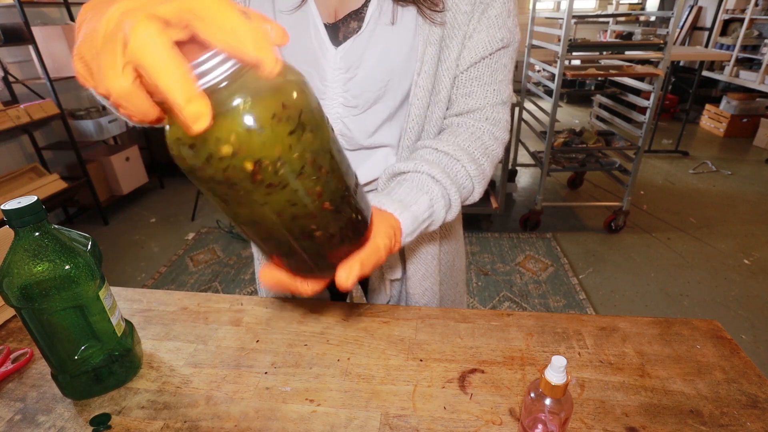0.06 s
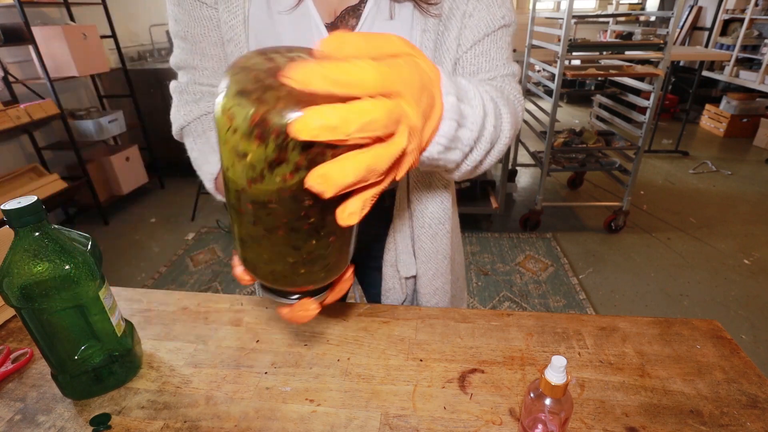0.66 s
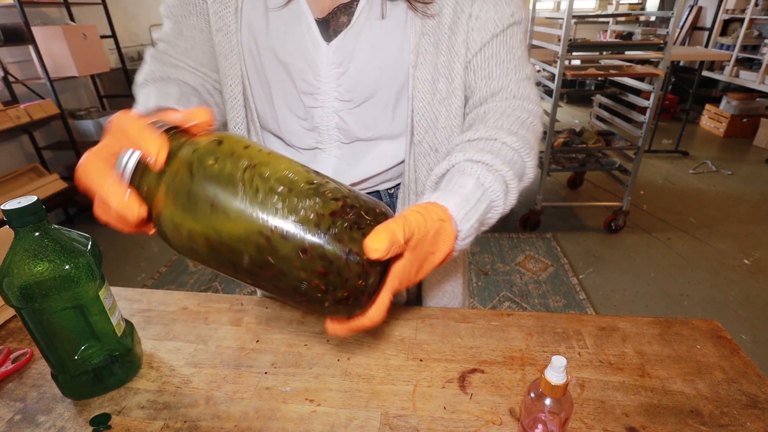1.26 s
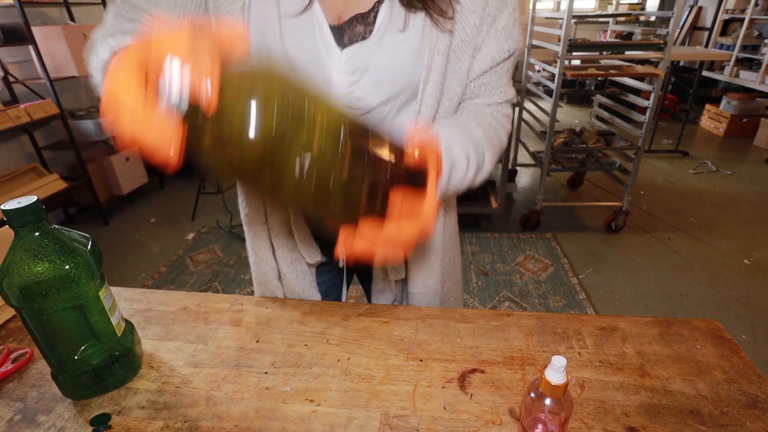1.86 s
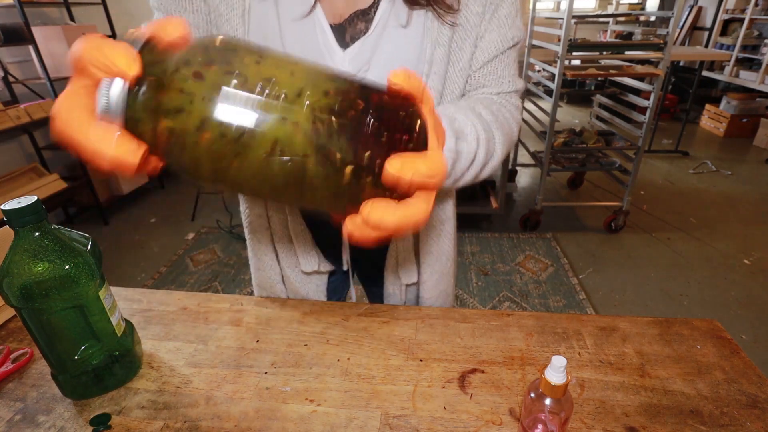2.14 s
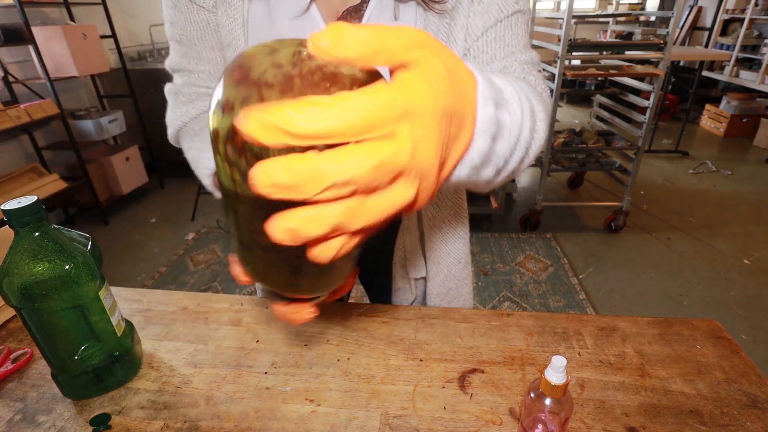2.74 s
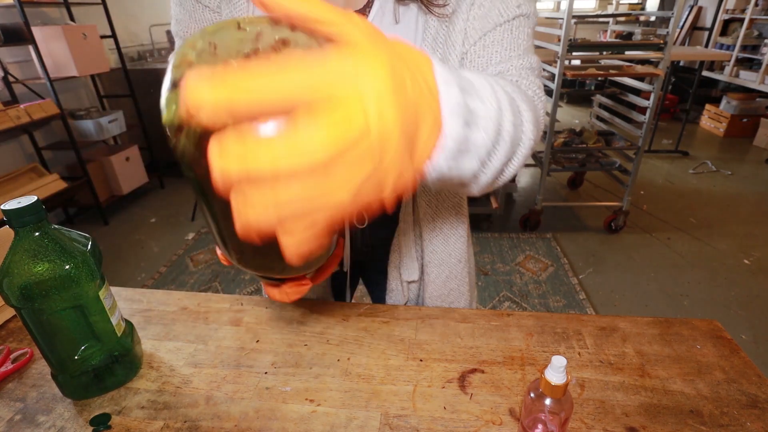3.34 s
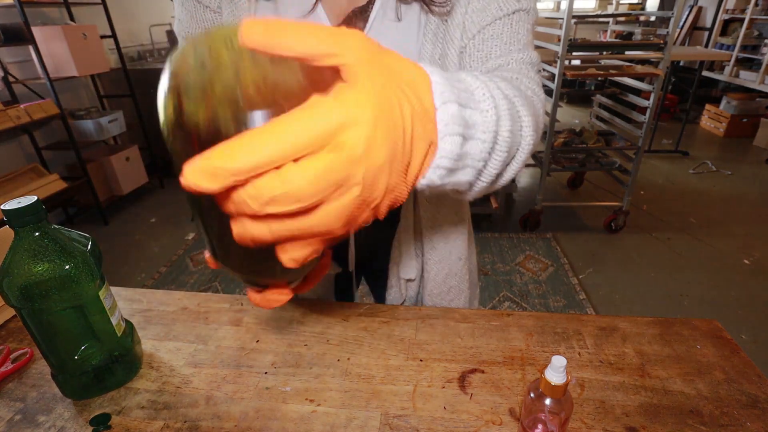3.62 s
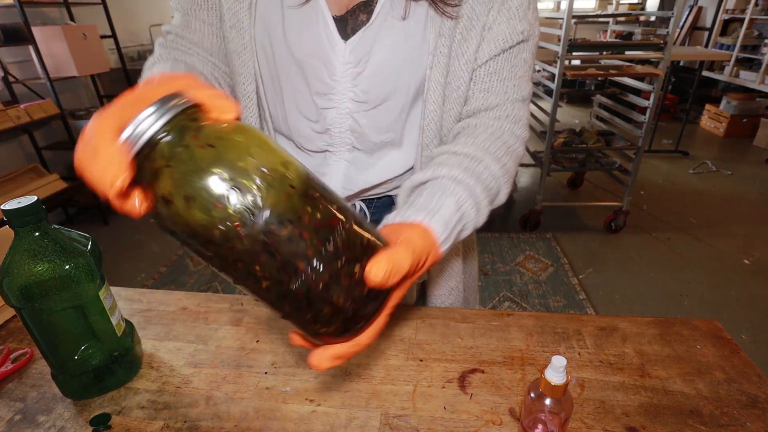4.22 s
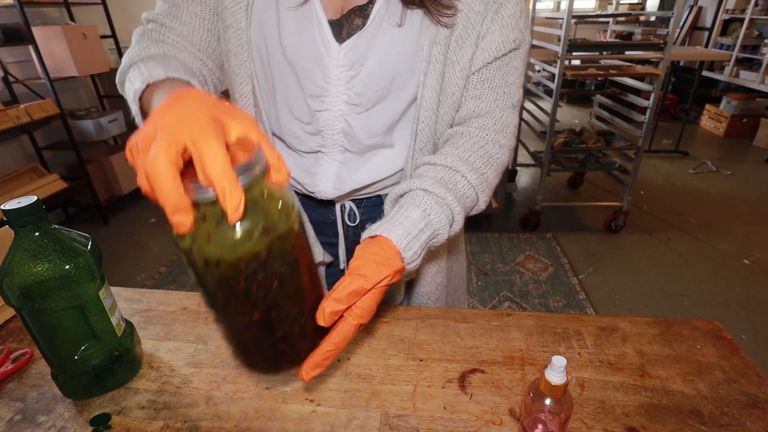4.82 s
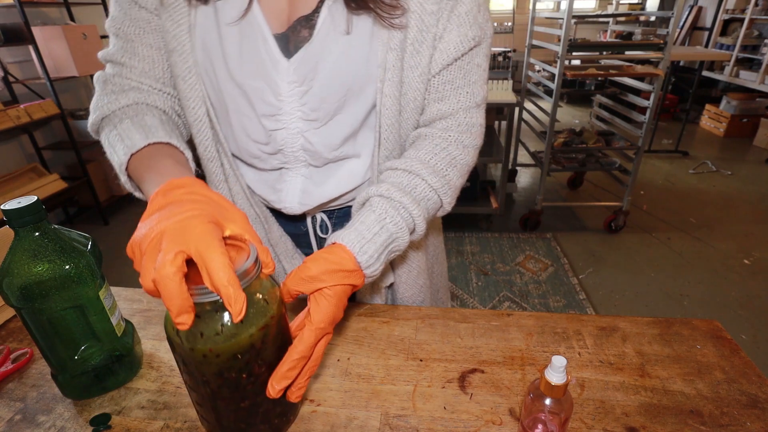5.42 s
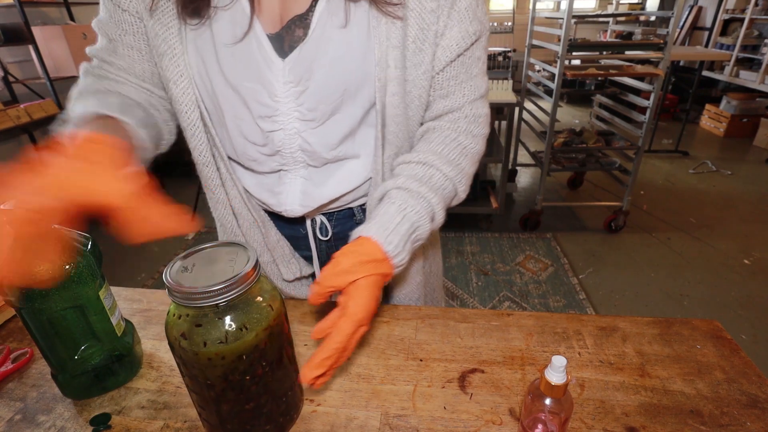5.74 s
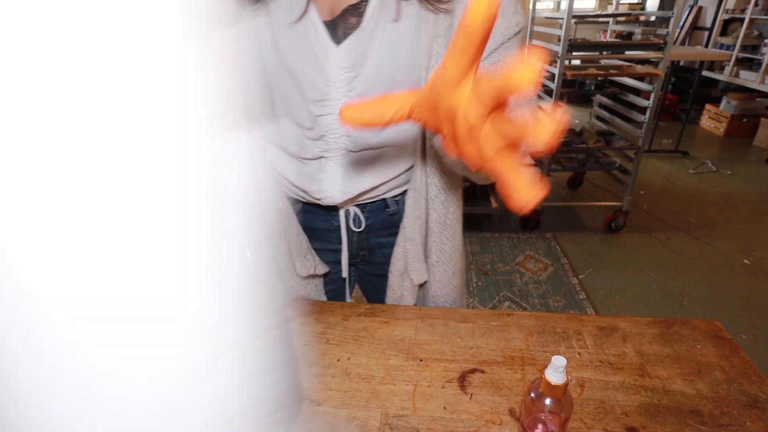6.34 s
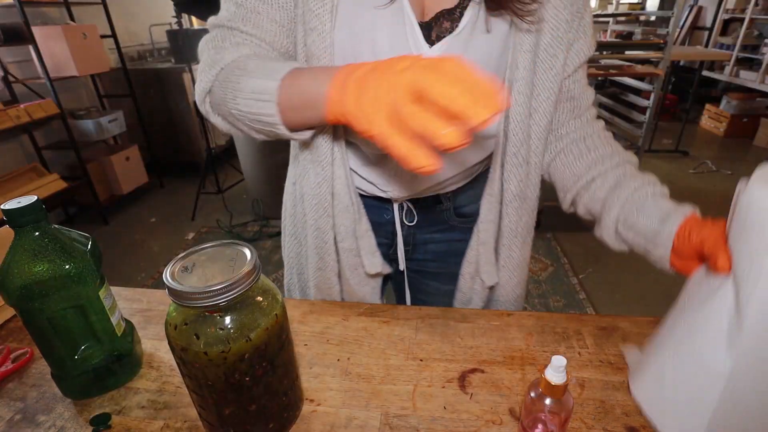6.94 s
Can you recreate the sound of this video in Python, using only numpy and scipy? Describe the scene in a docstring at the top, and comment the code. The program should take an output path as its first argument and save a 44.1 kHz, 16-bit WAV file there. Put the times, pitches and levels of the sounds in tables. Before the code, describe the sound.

Oil sloshes and glugs in a hand-shaken glass jar, which thumps onto a wooden bench before a plastic bucket knocks down hollowly.

```python
"""In a quiet workshop, gloved hands turn and shake a big glass jar of herbs in oil. Gloves and sleeves
rustle by stick-slip friction; air glugs through the oil, each bubble ringing as a mass of liquid on a
spring of gas. The jar is stood on a wooden bench, whose low modes thump and shake the microphone while
the lid band chinks. A plastic bucket is then dragged off the bench, slides through the hands, is caught
and is knocked down with a hollow ring."""
import sys
import numpy as np
from scipy import signal
from scipy.fft import rfft, irfft, next_fast_len
from scipy.io import wavfile

SR = 44100
rng = np.random.default_rng(int(sys.argv[2]) if len(sys.argv) > 2 else 0)


def generate_wav(signal):
    """Clip the signal to [-1, 1] and save it as 16-bit WAV at the path in sys.argv[1]."""
    frames = np.transpose(np.atleast_2d(signal))
    scaled = np.clip(frames, -1, 1) * 32767
    pcm = np.round(scaled).astype(np.int16)
    wavfile.write(sys.argv[1], SR, pcm)


N = 316197
TIME = np.arange(N) / SR

# spectrum of rubbing gloves and sleeves: (frequency [Hz], density [dB])
RUB_SPECTRUM = [(300, -45), (1500, -5.5), (2900, 0), (4400, 0), (5300, -6), (10000, -6.5), (15500, -23)]
# spectrum of skids and hard contacts: (frequency [Hz], density [dB])
CONTACT_SPECTRUM = [(120, -32), (220, -3), (350, -2.5), (600, -6.5), (4300, -3.5), (5200, -10),
                    (9000, -13.5), (15500, -30)]
# the jar's heel dragging on the wood: (time [s], level [dB])
HEEL_DRAG = [(5.12, -62), (5.16, -52), (5.32, -46), (5.57, -59.5)]
# the jar landing, then rocking flat: (time [s], level [dB], contact time [s])
JAR_BLOWS = [(5.582, 2.5, 0.00278), (5.648, -8.5, 0.0036)]
# the bucket dragged off the bench: (time [s], level [dB])
BUCKET_DRAG = [(5.96, -91), (6.01, -44.5), (6.076, -40), (6.168, -52.5), (6.174, -47), (6.42, -74)]
# the bucket caught, then its rim and base meeting the bench: (time [s], level [dB], contact time [s])
BUCKET_BLOWS = [(6.58, 6.5, 0.011), (7.1438, -7.5, 0.0007), (7.1495, 1, 0.0026)]


def from_db(db):
    """Amplitude ratio of a level: tenfold for every 20 dB."""
    return 10 ** (np.asarray(db) / 20)


def rms_one(x):
    """Normalisation to unit mean power."""
    return x / np.sqrt(np.mean(x ** 2) + 1e-20)


def add(out, onset, sound):
    """Superposition: mix a sound in from its onset [s]."""
    start = max(round(onset * SR), 0)
    part = sound[:max(N - start, 0)]
    out[start:start + len(part)] += part


def band(x, low_hz, high_hz, order=2):
    """Butterworth band-pass filtering."""
    edges = [low_hz, min(high_hz, SR / 2 - 1000)]
    return signal.sosfilt(signal.butter(order, edges, "band", fs=SR, output="sos"), x)


def coloured(x, spectrum, tilt_db=0):
    """Spectral shaping of a noise, with a tilt per octave; rms 1."""
    size = next_fast_len(len(x))
    octave = np.log2(np.maximum(np.arange(size // 2 + 1) * SR / size, 1))
    hz, db = np.transpose(spectrum)
    shape_db = np.interp(octave, np.log2(hz), db) + tilt_db * np.clip(octave, np.log2(hz[0]), None)
    shaped = irfft(rfft(x, size) * from_db(shape_db - shape_db.max()), size)
    return rms_one(shaped[:len(x)])


def decay(t, t60):
    """Exponential damping: 60 dB lost in t60 seconds."""
    return np.exp(-np.log(1000) * t / t60)


def swell(rise, t60):
    """Transient envelope: exponential growth for three rise times, then exponential decay."""
    t = np.arange(-3 * rise, t60, 1 / SR)
    return np.where(t < 0, np.exp(t / rise * np.sqrt(2)), decay(t, t60))


def hump(peak_s, db, half_length):
    """Gaussian envelope of a movement that speeds up and slows down smoothly."""
    return from_db(db) * np.exp(-.5 * ((TIME - peak_s) / half_length) ** 2)


def gain_curve(rows):
    """Envelope interpolated through (time [s], level [dB]) rows, silent from 50 ms beyond either end."""
    times, db = np.transpose(rows)
    return from_db(np.interp(TIME, times, db)) * (TIME > times[0] - .05) * (TIME < times[-1] + .05)


def grains(size, spread_db, grain_s):
    """Stick-slip friction: noise made of tiny slips of uneven strength; rms 1."""
    position = np.arange(size) / (grain_s * SR)
    slips = np.clip(rng.standard_normal(N // 8), -2.5, 2.5)
    strength = from_db(spread_db * np.interp(position, np.arange(len(slips)), slips))
    return rms_one(rng.standard_normal(N)[:size] * strength)


def room_air(level_db=-57.5):
    """Ambient noise: steady, and strongest at low frequencies."""
    # the quiet workshop: (frequency [Hz], density [dB])
    spectrum = [(25, -2), (102, 2.5), (210, -5), (290, -3.5), (766, -10.5), (3370, -20), (5630, -22.5),
                (15000, -27)]
    return from_db(level_db) * coloured(rng.standard_normal(N), spectrum)


def rustle(grain_db=3):
    """Sliding friction: rubber and wool rub with each turn of the jar."""
    # steady rubbing of the grip: (time [s], level [dB])
    grip = [(0, -63), (2.7, -55), (3.1, -71), (3.5, -60.5), (4.8, -72), (7.17, -64)]
    # strokes of glove and sleeve: (time [s], level [dB], half length [s], tilt [dB/octave])
    strokes = [(0.125, -50.5, 0.035, -2), (0.474, -54, 0.088, -6), (1.222, -54.5, 0.099, 4.5),
               (1.512, -46, 0.024, -1), (1.652, -49, 0.03, 5), (1.684, -48.5, 0.032, -2.5),
               (1.806, -50.5, 0.024, -4), (2.707, -50, 0.068, -5.5), (3.673, -53, 0.034, -2),
               (4.024, -56, 0.058, -2), (4.267, -56, 0.14, -1), (4.752, -60, 0.16, -3.5)]
    rubbing = coloured(grains(N, grain_db, 0.0018), RUB_SPECTRUM, tilt_db=-3.2)
    out = gain_curve(grip) * (rubbing + crinkles())
    for peak_s, db, half_length, tilt_db in strokes:
        friction = coloured(grains(N, grain_db, 0.00094), RUB_SPECTRUM, tilt_db)
        out += hump(peak_s, db, half_length) * friction
    return out


def crinkles(count=110, level_db=14, low_hz=1500, high_hz=3400, t60=0.0059):
    """Elastic release: rubber lets go in tiny ticks of random time, pitch and strength."""
    out, envelope = np.zeros(N), swell(.0001, t60)
    for when, place, strength in rng.random((count, 3)):
        hz = low_hz * (high_hz / low_hz) ** place
        tick = band(rng.standard_normal(SR // 4)[:len(envelope)] * envelope, hz / 2, hz * 2)
        add(out, when * N / SR, from_db(level_db) * (strength + .5) * tick / np.abs(tick).max())
    return out


def snaps(t60=.022, tail_db=-17, edge_ratio=1.42):
    """Impulse excitation: rubber snaps, lid band and handle click, each a spike with a crumbling tail."""
    # snaps and clicks: (time [s], peak level [dB], centre frequency [Hz])
    clicks = [(.362, -35, 3200), (0.389, -35.5, 2530), (1.057, -33, 2250), (1.387, -38, 2490),
              (1.664, -24, 2240), (2.037, -25.5, 5370), (2.117, -25.5, 6500), (2.333, -30.5, 4600),
              (2.47, -21, 3900), (3.099, -43.5, 2580), (3.506, -31, 3340), (4.274, -37, 3180),
              (4.765, -38.5, 1900), (5.417, -44.5, 2280), (6.324, -43, 2500), (6.502, -39.5, 920)]
    out, envelope = np.zeros(N), swell(0.0001, t60)
    for onset, db, hz in clicks:
        force = from_db(tail_db) * rng.standard_normal(N)[:len(envelope)] * envelope
        force[0] = 1
        crack = band(force, hz / edge_ratio, hz * edge_ratio)
        add(out, onset, from_db(db) * crack / np.abs(crack).max())
    return out


def bubble(hz, end_hz, t60, rise_cycles):
    """Minnaert resonance: liquid bounces on a spring of air and rings down as the pitch glides."""
    t = np.arange(int(t60 * SR) + 2) / SR
    pitch = end_hz + (hz - end_hz) * np.exp(-4 * t / t60)
    attack = 1 - np.exp(-t * hz / rise_cycles)
    return np.sin(2 * np.pi * np.cumsum(pitch) / SR) * attack * decay(t, t60)


def cloud(size, centre_hz, spread_octaves, ring_cycles, count, range_db=18.5):
    """Incoherent sum of quickly damped bubbles of uneven strength, each rising in pitch; rms 1."""
    out = np.zeros(N)
    for when, place, strength in rng.random((count, 3)):
        hz = centre_hz * 2 ** (spread_octaves * (2 * place - 1))
        ring = bubble(hz, hz * 1.18, ring_cycles / hz, rise_cycles=1)
        add(out, when * size / SR, from_db(range_db * strength) * ring)
    return rms_one(out[:size])


def waver(size, hz):
    """Random modulation: a new Gaussian value is reached every second cycle of a tone."""
    return np.interp(np.arange(size) * hz / SR / 2, np.arange(1000), rng.standard_normal(1000))


def glugs_and_clink(gain_db=2, chirp_hz=455, unsteady_db=3, shed_db=-14, shed_t60=0.046):
    """Bubble resonances chirp upwards; passing herbs make each unsteady and tear smaller bubbles off.
    One faint clink of the glass is voiced in the same way."""
    # single bubbles breaking free, and one faint high clink of the glass jar:
    # (time [s], level [dB], frequency [Hz], t60 [s])
    rings = [(0.389, -41.5, 334, 0.023), (.388, -38.5, 1110, 0.034), (.389, -30.5, 1750, 0.021),
             (.388, -31.5, 3000, 0.02), (.449, -33.5, 677, 0.099), (.486, -41, 3150, .02),
             (.593, -40, 850, 0.051), (2.09, -35.5, 1055, 0.041), (2.132, -32, 2900, 0.028),
             (2.139, -25, 2500, .022), (2.148, -21, 1360, 0.02), (2.147, -24, 885, .021),
             (2.243, -13.5, 1340, 0.011), (2.252, -27.5, 1940, 0.028), (2.331, -22, 424, 0.015),
             (2.337, -21.5, 890, 0.017), (2.345, -24, 1170, 0.019), (2.353, -25.5, 1650, 0.012),
             (2.447, -34, 1060, 0.087), (2.4695, -27.5, 4030, 0.01), (2.482, -18.5, 1510, 0.012),
             (2.492, -32, 970, 0.087), (2.534, -28.5, 1980, 0.021), (2.5674, -20, 1190, 0.058),
             (2.579, -20.5, 1805, 0.031), (2.601, -24, 1730, 0.016), (3.589, -27.5, 1370, 0.0095),
             (3.589, -40.5, 4410, 0.048), (4.262, -31.5, 2070, .006), (4.987, -38, 1370, 0.011)]
    out, shedding = np.zeros(N), swell(.001, shed_t60)
    for onset, db, hz, t60 in rings:
        end_hz = hz + chirp_hz * np.sqrt(from_db(db))   # weaker rings rise less
        ring = bubble(hz, end_hz, t60, rise_cycles=0.089)
        add(out, onset, from_db(db + gain_db + unsteady_db * waver(len(ring), hz)) * ring)
        fragments = cloud(len(shedding), hz, spread_octaves=0.98, ring_cycles=8.9, count=32)
        add(out, onset, from_db(db + shed_db) * shedding * fragments)
    return out


def air_pockets(unsteady_db=2.5, rise_cycles=0.48, fade_db=17):
    """Resonance depends on size: a big pocket glides as it deforms, and stops when it breaks up."""
    # air squeezed or stretched by the falling oil:
    # (time [s], level [dB], start frequency [Hz], end frequency [Hz], length [s])
    pockets = [(0.457, -29, 126.5, 107, 0.091), (2.09, -23, 325, 225, 0.015),
               (2.152, -14, 270.7, 217, 0.06), (2.161, -17, 500, 680, 0.034), (2.268, -27, 151, 166, 0.042),
               (2.298, -30.5, 179, 262, 0.146), (2.474, -18, 138, 167, 0.033),
               (2.493, -25.5, 271, 294, 0.019), (2.56, -22.5, 276, 187, 0.018), (2.583, -27, 150, 99, 0.1),
               (2.652, -29.5, 843, 560, 0.031)]
    out = np.zeros(N)
    for onset, db, hz, end_hz, length in pockets:
        t = TIME[:int(length * SR)]
        age = t / length
        attack = 1 - np.exp(-t * hz / rise_cycles)
        break_up = np.minimum(5 * (1 - age), 1)
        envelope = attack * from_db(-fade_db * age) * break_up
        ring = np.sin(2 * np.pi * np.cumsum(hz + (end_hz - hz) * age) / SR)
        add(out, onset, from_db(db + unsteady_db * waver(len(t), hz)) * envelope * ring)
    return out


def splashes(spray_db=-10, spray_top_hz=4500, droplets_db=-21,
             gurgle_hz=875, gurgle_db=-1, froth_hz=2430, froth_db=-17):
    """Air entrainment: each slap bursts into fizz, spray and droplets, leaving a gurgle and froth."""
    # oil slapping the glass: (time [s], level [dB], centre frequency [Hz], rise time [s])
    slaps = [(.462, -39.5, 1270, 0.011), (2.105, -32.5, 2260, 0.0015), (2.149, -30.5, 1850, 0.018),
             (2.245, -34, 1770, 0.0011), (2.352, -34, 1470, 0.011), (2.471, -32.5, 3120, 0.00061),
             (2.577, -29, 1450, 0.01)]
    out = np.zeros(N)
    for peak_s, db, centre_hz, rise in slaps:
        slap, trail, settling = swell(rise, t60=.07), swell(rise, t60=.17), swell(rise, t60=.5)
        fizz = cloud(len(slap), centre_hz, spread_octaves=0.6, ring_cycles=8.8, count=40)
        spray = rms_one(band(grains(len(slap), 5.8, 0.00059), centre_hz / 2, spray_top_hz, order=3))
        ticking = rms_one(band(grains(len(trail), 8, .0018), 5000, 9500))
        fineness = (centre_hz / spray_top_hz * 2) ** 2   # finer splashes throw more droplets
        droplets = from_db(droplets_db) * fineness * ticking
        # larger bubbles trail the splash; tiny ones go on popping among the herbs
        gurgle = cloud(len(trail), gurgle_hz, spread_octaves=1.366, ring_cycles=17, count=80)
        froth = cloud(len(settling), froth_hz, spread_octaves=0.59, ring_cycles=20, count=45)
        onset = peak_s - 3 * rise
        add(out, onset, from_db(db) * slap * (fizz + from_db(spray_db) * spray))
        add(out, onset, from_db(db) * trail * (from_db(gurgle_db) * gurgle + droplets))
        add(out, onset, from_db(db + froth_db) * settling * froth)
    return out


def oil_wash():
    """Flow noise: oil runs softly along the glass."""
    # surges of oil: (time [s], level [dB], half length [s])
    surges = [(1.315, -55.5, 0.48), (2.548, -45, 0.15), (3.813, -54.5, 0.24), (4.844, -58.5, 0.24)]
    # running oil: (frequency [Hz], density [dB])
    spectrum = [(60, -22), (200, -11), (400, -1.5), (650, -16.5), (1050, -12.5), (1800, -32), (6000, -81)]
    return sum(hump(*surge) for surge in surges) * coloured(rng.standard_normal(N), spectrum)


def regrip(peak_s=0.898, db=-48, half_length=0.017, low_hz=1900, high_hz=3300):
    """Sliding friction: a glove swishes briefly round the glass to a new grip."""
    return hump(peak_s, db, half_length) * rms_one(band(grains(N, 1.9, 0.0033), low_hz, high_hz))


def skids(grain_db=1.0, attack_s=0.0041, t60=0.092):
    """Stick-slip motion: the rubber lets go at once, chatters along the glass and grips again."""
    # gloves skidding as the jar is stopped: (time [s], level [dB], length [s])
    slips = [(1.519, -36, 0.007), (1.832, -36.5, 0.0035), (3.502, -44, 0.021), (3.728, -39, 0.031)]
    out, t = np.zeros(N), TIME[:SR // 3]
    for onset, db, length in slips:
        envelope = np.minimum(t / attack_s, 1) * decay(np.maximum(t - length, 0), t60)
        chatter = coloured(grains(len(t), grain_db, 0.0019), CONTACT_SPECTRUM)
        add(out, onset, from_db(db) * envelope * chatter)
    return out


def palm_thuds(pitch_hz=95, t60=0.032):
    """A heavily damped oscillation: the full jar thuds softly in the hand."""
    # palms bumping the jar: (time [s], level [dB])
    bumps = [(1.531, -40), (3.743, -32)]
    out, t = np.zeros(N), TIME[:SR // 4]
    for onset, db in bumps:
        add(out, onset, from_db(db) * np.sin(2 * np.pi * pitch_hz * t) * decay(t, t60))
    return out


def heel_drag(low_hz=240, high_hz=317):
    """Friction in a narrow band: the jar's heel drags on the wood."""
    return gain_curve(HEEL_DRAG) * rms_one(band(rng.standard_normal(N), low_hz, high_hz))


def shudder(heel_db=-40, bucket_gain_db=5, landing_db=-22, tremble_db=-52.5):
    """Structure-borne sound: dragging and the jar's landing shake the bench, and so the microphone."""
    # rumble of the bench: (frequency [Hz], density [dB])
    spectrum = [(18, -42), (30, 7), (42, 4.5), (70, 2), (135, -9.5), (185, -22), (290, -19), (600, -32.5),
                (1000, -40.5), (3000, -79)]
    landing_s, heel = JAR_BLOWS[0][0], gain_curve(HEEL_DRAG)
    shaking = from_db(heel_db) * (heel / heel.max()) ** 2
    shaking += from_db(bucket_gain_db) * gain_curve(BUCKET_DRAG)
    shaking += from_db(tremble_db) * (TIME > landing_s)   # working hands keep the bench trembling
    add(shaking, landing_s, from_db(landing_db) * swell(rise=0.022, t60=1.37))
    return shaking * coloured(rng.standard_normal(N), spectrum)


def struck(blow, modes, longest_t60=1):
    """Modal response to a smooth force pulse: the longer the contact, the duller the blow."""
    onset, db, contact_s = blow
    t, out = TIME[:SR], np.zeros(N)
    rings = sum((-1) ** k * from_db(mode_db) * np.sin(2 * np.pi * hz * t) * decay(t, min(t60, longest_t60))
                for k, (hz, mode_db, t60) in enumerate(modes))
    push = np.hanning(max(int(contact_s * SR), 1) + 2)
    add(out, onset, from_db(db) * signal.fftconvolve(rings, push / push.sum()))
    return out


def jar_landing():
    """Impact excitation: the heavy jar sets the bench's modes booming."""
    # the bench loaded with the jar: (frequency [Hz], level [dB], t60 [s])
    modes = [(36.44, -6, 0.43), (40.34, -4, 0.37), (116.8, 6.5, 0.039), (148.8, -1, 0.098),
             (257, -11, 0.059), (254, -29.5, 0.42), (435, -19.5, 0.16), (573, -18.5, 0.21),
             (885, -6.5, 0.14)]
    return sum(struck(blow, modes) for blow in JAR_BLOWS)


def contact_cracks(grain_db=2.5):
    """Contact noise: a splintery burst of friction as the jar or the bucket meets the wood."""
    # hard contacts: (time [s], level [dB], rise time [s], t60 [s], tilt [dB/octave])
    cracks = [(5.584, -29, 0.000806, 0.25, -7.5), (5.616, -21.5, 0.0058, 0.17, -11),
              (7.145, -12.5, 0.000945, 0.067, -8)]
    out = np.zeros(N)
    for peak_s, db, rise, t60, tilt_db in cracks:
        envelope = swell(rise, t60)
        friction = coloured(grains(len(envelope), grain_db, .0012), CONTACT_SPECTRUM, tilt_db)
        add(out, peak_s - 3 * rise, from_db(db) * envelope * friction)
    return out


def lid_chink(ring_db=-2, buzz_s=0.002, rattle_db=-38.5):
    """Amplitude modulation: the loose band buzzes against the glass, which roughens its ring."""
    # lid band and glass: (frequency [Hz], level [dB], t60 [s])
    modes = [(1700, -49, .45), (2200, -47, 0.64), (2250, -36.5, 0.2), (2390, -53, 0.42), (6040, -41, 0.12)]
    # the band striking as the jar settles: (time [s], level [dB], contact time [s])
    blow = (5.612, 0, .0001)
    buzz = 1 + np.interp(TIME / buzz_s, np.arange(N), rng.standard_normal(N))
    out = from_db(ring_db) * buzz * struck(blow, modes)
    envelope = swell(rise=0.00064, t60=0.21)
    rattle = rms_one(band(grains(len(envelope), 1.5, 0.00076), 2600, 5700))
    add(out, blow[0], from_db(rattle_db) * envelope * rattle)
    return out


def bucket_friction(swing_db=-49, swing_s=0.054):
    """Stick-slip friction: plastic rasps over wood, then rubber; the bucket whooshes through the air on the
    downswing."""
    # the bucket sliding through the gloves: (time [s], level [dB])
    slide_levels = [(6.57, -65), (6.582, -31.5), (6.611, -33), (6.643, -46), (6.655, -39), (6.712, -35.5),
                    (6.74, -41), (6.755, -59)]
    # rasping plastic: (frequency [Hz], density [dB])
    spectrum = [(120, 4.5), (240, 3), (500, 0), (900, 1), (2000, -5.5), (4300, -9.5), (5200, -16.5),
                (9000, -20.5), (15500, -36)]
    drag = gain_curve(BUCKET_DRAG) * coloured(grains(N, 2.2, 0.0055), spectrum)
    slide = gain_curve(slide_levels) * coloured(grains(N, 4.3, .002), spectrum)
    whoosh = coloured(grains(N, 4.0, 0.00085), RUB_SPECTRUM, tilt_db=-19.5)
    landing_s = BUCKET_BLOWS[1][0]
    return drag + slide + hump(landing_s, swing_db, swing_s) * whoosh


def bucket_knocks(held_t60=0.044):
    """Modal damping: the bucket bumps dully in the hand, then rings free and hollow on the bench."""
    # the plastic bucket: (frequency [Hz], level [dB], t60 [s])
    modes = [(94, -5, 0.11), (116, -4.5, 0.26), (179.6, -8.5, 0.28), (294, -13, 0.065), (408, -19, 0.025),
             (620, -9.5, 0.068), (980, 1, 0.039), (1330, -1, 0.03), (2245, -3, 0.049)]
    caught, *landing = BUCKET_BLOWS
    return struck(caught, modes, held_t60) + sum(struck(blow, modes) for blow in landing)


def reverberation(x, level_db=-16.5, t60=0.42, wall_hz=5450, delay_s=.004):
    """Diffuse reflection: dense, dull echoes from shelves and walls."""
    t = TIME[:SR]
    echoes = band(rng.standard_normal(SR), 128, wall_hz, order=1) * decay(t, t60) * (t > delay_s)
    return from_db(level_db) * signal.fftconvolve(x, echoes / np.sqrt(np.sum(echoes ** 2)))[:N]


def scene():
    """Superposition of all sources; the room's air, the rustle and the wash carry no echoes."""
    shaken = glugs_and_clink() + air_pockets() + splashes()
    hands = snaps() + palm_thuds() + skids() + regrip()
    jar = heel_drag() + shudder() + jar_landing() + lid_chink()
    bucket = bucket_friction() + bucket_knocks()
    direct = shaken + hands + jar + bucket + contact_cracks()
    return (direct + room_air() + reverberation(direct) + rustle() + oil_wash())[None]


def record(dry, low_hz=12, high_hz=15900):
    """Band limiting and clipping: the deepest rumble, peaks beyond full scale and the top are cut."""
    high_pass = signal.butter(1, low_hz, "high", fs=SR, output="sos")
    low_pass = signal.ellip(10, .1, 80, high_hz, fs=SR, output="sos")
    clipped = np.clip(signal.sosfilt(high_pass, dry), -1, 1)
    return signal.sosfilt(low_pass, clipped)


dry = scene()
out = record(dry)
generate_wav(out)
```